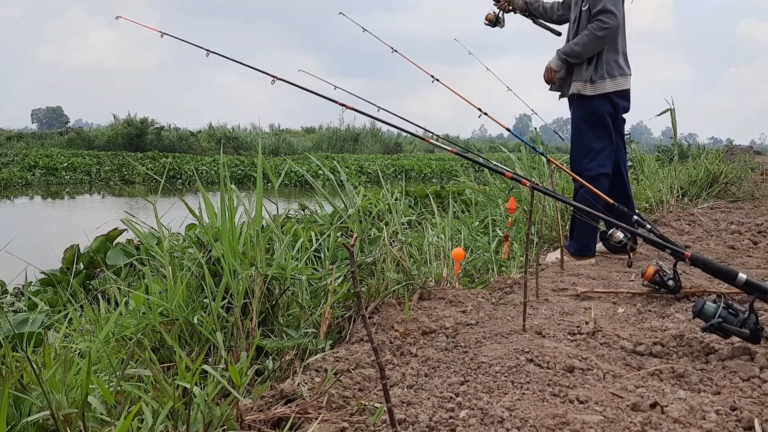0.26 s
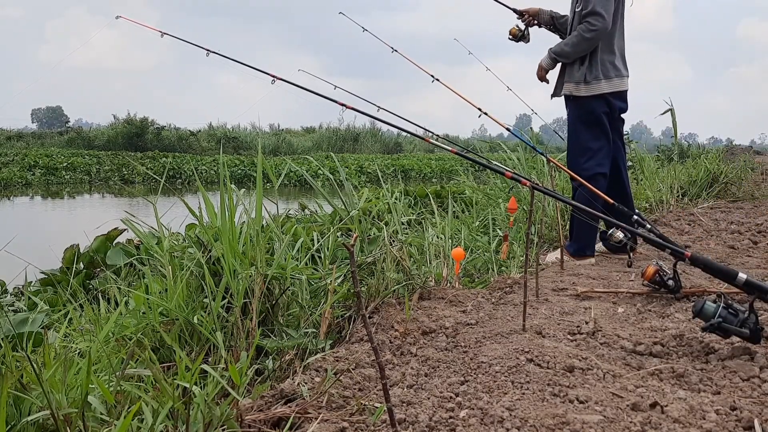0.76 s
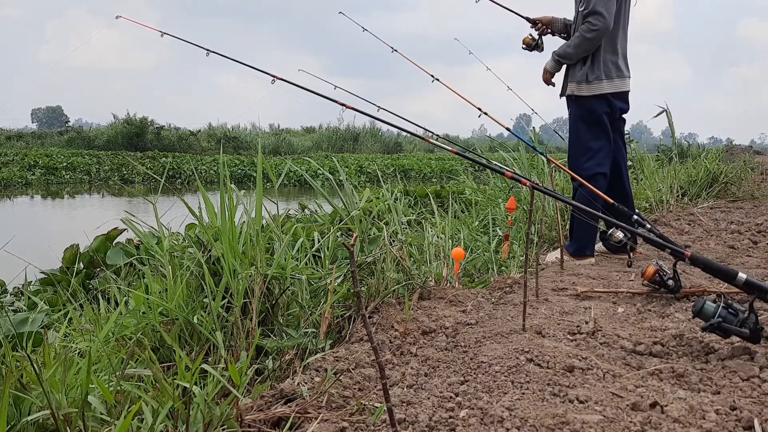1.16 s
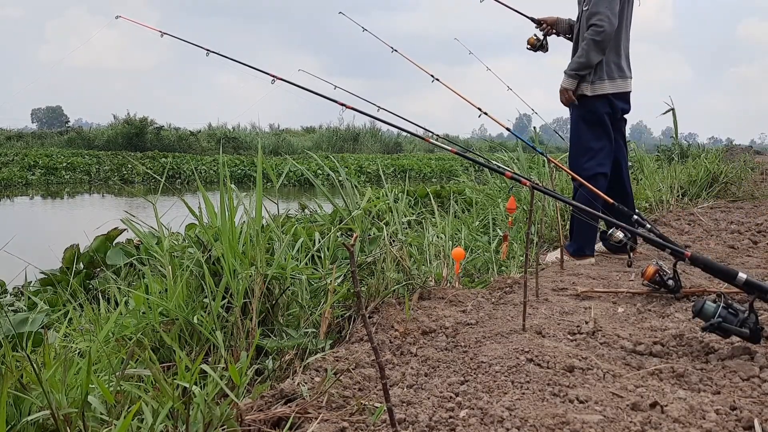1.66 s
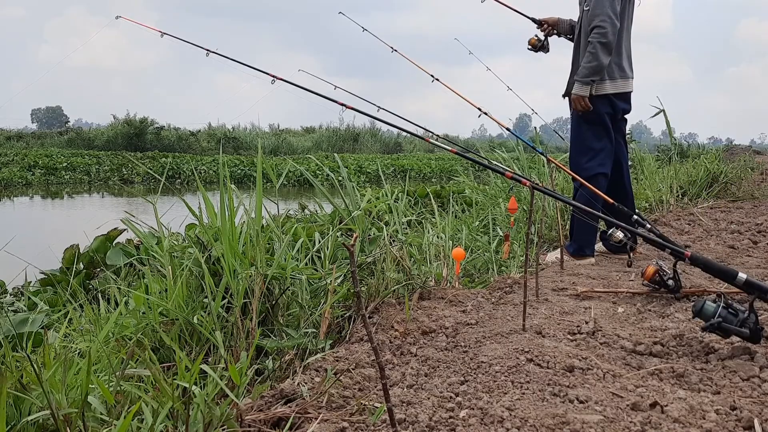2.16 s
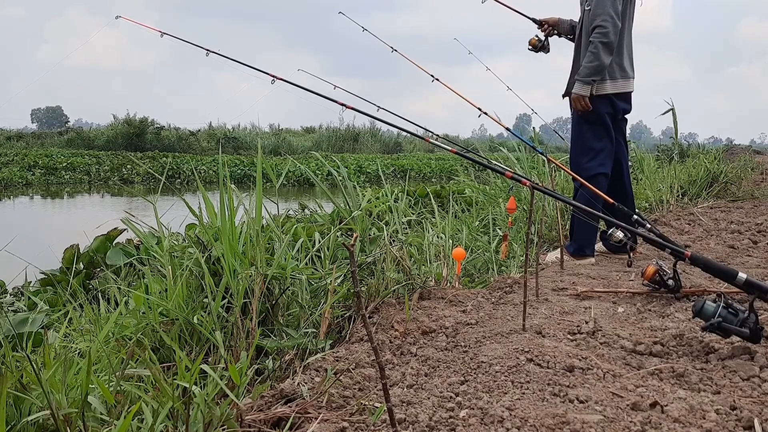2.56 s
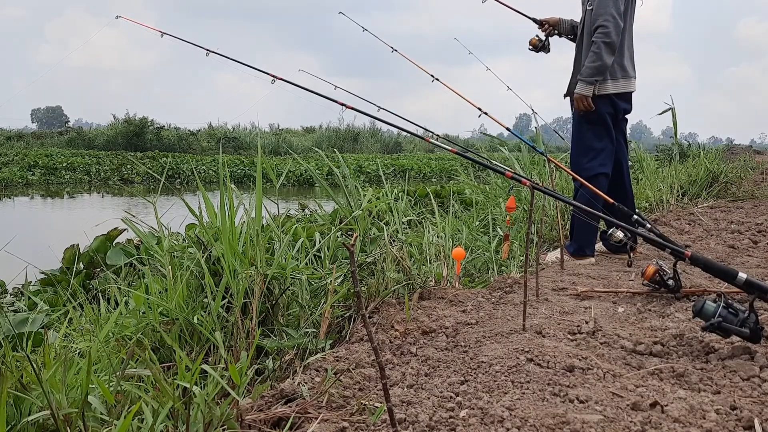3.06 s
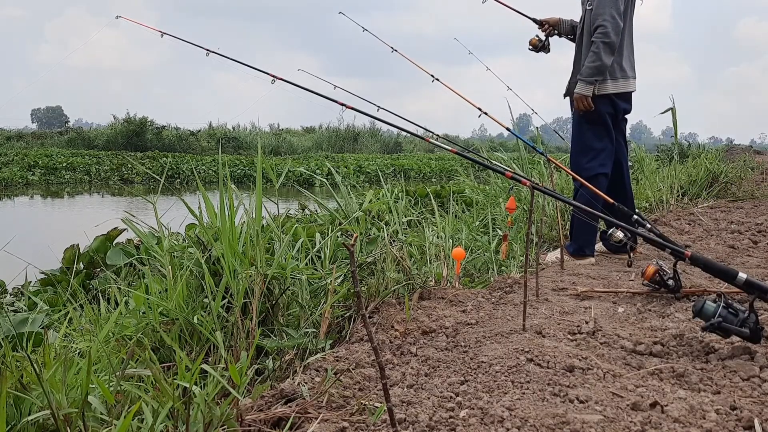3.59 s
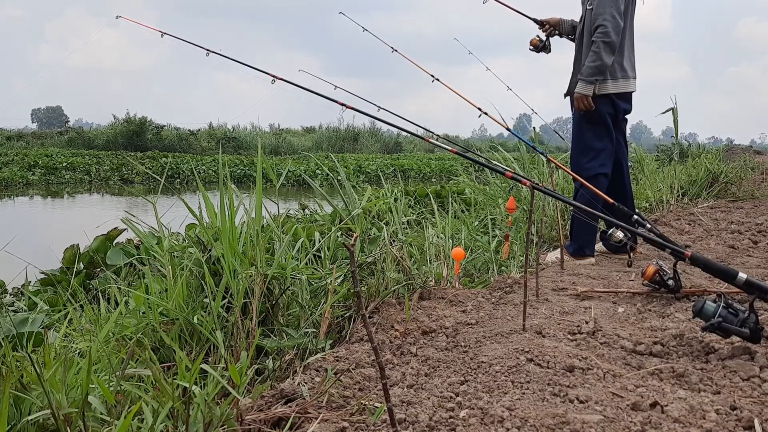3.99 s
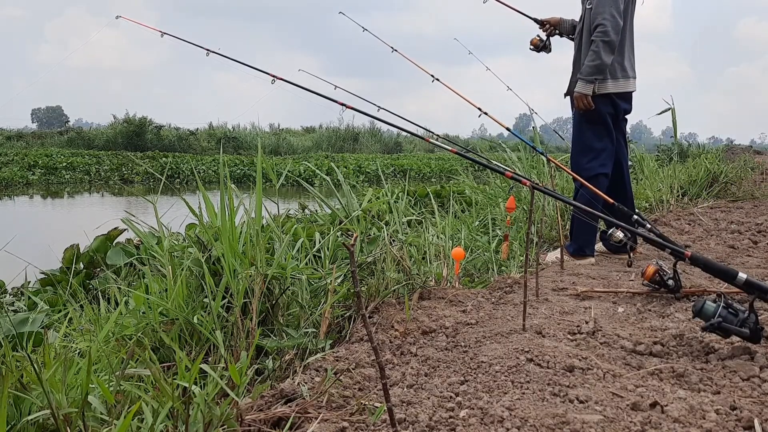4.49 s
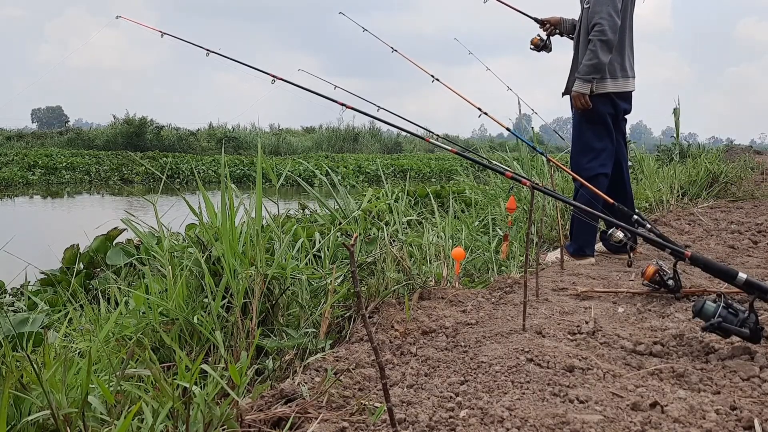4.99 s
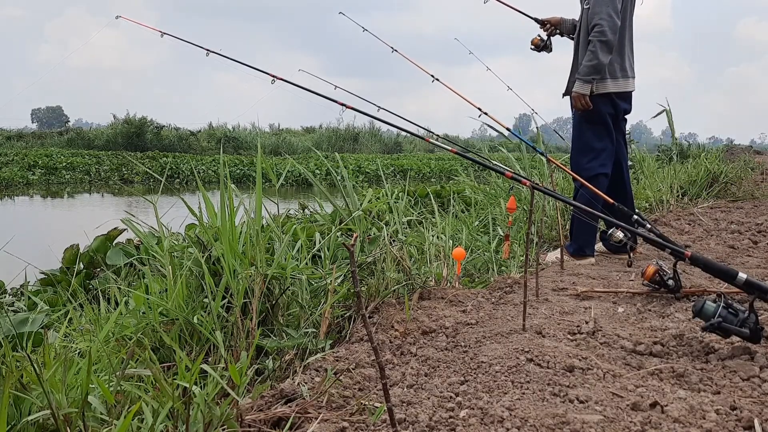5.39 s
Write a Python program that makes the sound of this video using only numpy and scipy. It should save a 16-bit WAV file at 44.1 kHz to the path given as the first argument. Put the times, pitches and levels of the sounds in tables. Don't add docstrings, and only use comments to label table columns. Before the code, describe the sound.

On an open grassy pond bank, a stereo phone picks up rolling wind and two far pump engines droning low. A thump hits the right early, heavy bursts follow between about 1.7 and 3.4 seconds, then more near 4.8 and 5.5. Faint grass hiss, dry ticks, a high insect scrape, tiny bird chirps and distant road hum sit beneath.

```python
import sys
import numpy as np
from scipy import signal
from scipy.fft import rfft, irfft, next_fast_len
from scipy.io import wavfile
from scipy.ndimage import map_coordinates

SR = 44100
rng = np.random.default_rng(int(sys.argv[2]) if len(sys.argv) > 2 else 0)


def rack_gain(trim_db):
    fader = np.asarray(trim_db, float)
    return 10 ** (fader / 20)


def unload_audio(sound):
    columns = np.transpose(np.atleast_2d(sound))
    steps = np.round(np.clip(columns, -1, 1) * 32767)
    wavfile.write(sys.argv[1], SR, steps.astype(np.int16))


N = 248724
TIME_S = np.arange(N) / SR

# frequency in [Hz], density in [dB per Hz].
AIR_SPECTRUM = [(500, -12.5), (1300, -0.5), (2000, 0.5), (3000, -1), (3600, -4.5), (5000, -9),
                (16000, -9.5)]
# frequency in [Hz], density in [dB per Hz].
ROAD_SPECTRUM = [(450, -36), (640, -6.5), (770, 1.5), (950, -0.5), (1180, -3), (1300, -7), (1800, -27.5),
                 (3000, -27)]
# time in [s], level in [dB], nearness as brightness in [dB].
TRAFFIC = [(0, -68, 5), (.42, -61, -12.5), (.58, -67, 1), (.75, -62, -10), (1.2, -64.5, -7.5),
           (1.68, -60.5, -16), (2.2, -59, -15), (2.52, -65, -7), (2.85, -56.5, -7), (3.08, -69.5, 10.5),
           (3.3, -61, -4), (3.68, -60.5, 4.5), (3.92, -63.5, -3), (4.15, -62, 2.5), (4.4, -60.5, -1),
           (4.75, -60, -10), (5.05, -63.5, 1.5), (5.64, -61, -15)]
# frequency in [Hz], density in [dB per Hz].
GRASS_SPECTRUM = [(3000, -14), (4300, -7.5), (5600, -3.5), (6400, -1.5), (7400, -2), (8600, -1.5),
                  (9300, -5), (10200, -5.5), (11300, -2), (11800, -3.5), (13000, -1), (14200, -4),
                  (15600, -4)]
# time in [s], level in [dB], thin tips against broad blades in [dB].
SWAY = [(0, -59.5, -0.5), (.3, -61, -0.5), (.56, -60, -2.5), (.95, -65.5, 1), (1.2, -63.5, 1.5),
        (1.55, -60, 0.5), (1.85, -56, 1.5), (2.35, -58, 1), (2.66, -62, 2.5), (3.05, -59, -5),
        (3.25, -65, 0.5), (3.5, -62, 0.5), (4.06, -67, -1), (4.48, -64, 0.5), (4.98, -65.5, 1),
        (5.22, -63.5, -2.5), (5.46, -65.5, -3), (5.64, -64, -3)]
# time in [s], rise left in [dB], rise right in [dB], length in [ms].
RUSTLES = [(.032, 3, 0, 28), (.182, 4.5, 0, 40), (.4, 6, 1, 32), (0.587, 3.5, -3, 30),
           (1.242, 7.5, 2.5, 39), (2.584, -0.5, 3, 28), (2.783, 4.5, 2, 15), (2.866, 1, 8.5, 25),
           (3.048, 4, 6, 12), (4.736, 4, 2, 24), (4.895, 5, 7, 18), (5.22, 3.5, 2.2, 63)]
# time in [s], peak in [dB], frequency in [Hz], left minus right in [dB].
TICKS = [
    (0.9803, -34.5, 8000, 3),
    (1.207, -34, 7880, 0.5),
    (2.852, -37, 6560, 0),
    (3.3861, -47.5, 5040, 0),
    (4.4698, -36, 8130, -8),
    (4.731, -35, 7800, 0.0),
    (4.891, -38, 7480, 1),
    (5.5993, -40.5, 7700, 8),
]
# frequency in [Hz], width in [Hz], level in [dB].
WING_RESONANCES = [
    (7720, 140, -68),
    (7990, 320, -67),
    (11350, 300, -75),
]
# start in [s], length in [s], start pitch in [Hz], end pitch in [Hz], level in [dB].
CHIRPS = [(0.641, .075, 1780, 1950, -69), (.68, 0.055, 1660, 1820, -68), (0.735, 0.053, 1660, 1740, -68),
          (1.94, 0.089, 3080, 3200, -66.5), (2.155, 0.083, 2930, 2680, -66),
          (2.22, 0.06, 2900, 3090, -65.5), (2.389, 0.04, 2720, 2720, -67.5), (2.43, .05, 2780, 3010, -68),
          (2.39, .08, 2250, 2330, -73), (2.619, 0.064, 2700, 2770, -71), (3.42, 0.046, 4050, 3980, -68),
          (3.507, 0.057, 3170, 3240, -69), (3.52, .04, 2950, 2900, -68)]
# frequency in [Hz], density in [dB per Hz].
ROLL_SPECTRUM = [(15, -17), (30, -28), (45, -2.5), (60, -4), (85, -0.5), (105, 3), (140, -8), (160, -9),
                 (200, -20), (260, -29.5), (400, -38.5)]
# frequency in [Hz], density in [dB per Hz].
WHOOSH_SPECTRUM = [(150, -2), (230, -6), (295, 4), (340, -1.5), (420, -13), (600, -15.5), (1000, -27),
                   (2000, -39.5)]
# time in [s], gust strength in [dB], veer towards the left port in [dB].
WIND = [(0, -51, -1), (.3, -57.5, 5), (.56, -49.5, 4), (.95, -62.5, -3), (1.3, -53.5, 3.5), (1.55, -53, -2),
        (1.8, -51, 7), (2.15, -49, 0), (2.5, -53.5, 7), (2.75, -51, -10), (3.1, -55, -2),
        (3.4, -50.5, -5.5), (3.95, -56.5, 3), (4.4, -56, -4.5), (4.62, -52.5, 6), (4.88, -54, -12),
        (5.2, -56, 0), (5.64, -58.5, -0.5)]
# time in [s], peak in [dB], frequency in [Hz], length in [ms].
BUFFETS = [(0.153, -7.5, 74, 19.4), (0.193, -24, 96, 10), (1.672, -41, 80.03, 17),
           (1.716, -44, 81.08, 22.3), (1.747, -29, 79.2, 13), (1.858, -7, 86, 15), (1.88, -23, 56.5, 5.0),
           (1.893, -22, 77.0, 11.6), (2.027, -30, 75.27, 20.0), (2.548, -25, 74.0, 14.0),
           (2.59, -32, 75.0, 16.1), (2.682, -15, 62.5, 23.0), (2.718, -24, 75, 19), (2.75, -20, 73, 12.4),
           (2.786, -10.5, 58.75, 30.0), (2.822, -13, 70.6, 15), (2.851, -19, 62.17, 14.0),
           (2.892, -6.5, 75.6, 22.8), (2.954, -12.5, 71, 19), (3.064, -38, 68.3, 18.4),
           (3.259, -30, 78.3, 28.0), (3.384, -10, 75.96, 17.4), (3.425, -35, 65, 23.0),
           (3.603, -34, 65.5, 40.0), (4.785, -10, 82, 23), (4.806, -22, 110.0, 6.8),
           (4.825, -11.5, 119, 10.5), (4.895, -16.5, 101, 19), (4.914, -26, 78.0, 9.3),
           (5.473, -16, 75, 15)]
# time in [s], peak in [dB], frequency in [Hz], length in [ms].
FLICKS = [
    (2.74, -23, 170, 4.8),
    (2.905, -29.5, 240, 4.2),
    (5.3, -29.5, 299, 9),
    (4.829, -26, 206, 6.5),
    (4, -28, 170, 8),
]
# time in [s], big pump firing in [Hz], small pump firing in [Hz].
SPEED = [(0, 96.6, 57), (.55, 96.3, 57.2), (.9, 97.5, 57.1), (1.4, 96.2, 57.5), (2, 96.1, 58.1),
         (2.7, 96.7, 58), (3.6, 96.5, 58), (4.2, 96.9, 57.4), (4.8, 96.1, 57.1), (5.3, 95.7, 58.1),
         (5.64, 96.2, 58.5)]
# time in [s], level in [dB].
BIG_LEVEL = [(0, -23), (.22, -23), (.58, -20.5), (.76, -27), (1.1, -30.5), (1.43, -19), (1.76, -20),
             (2.2, -22), (2.42, -21), (2.75, -25), (3.08, -21.5), (3.42, -19.5), (3.74, -25), (4.2, -27),
             (4.62, -29.5), (4.84, -23.5), (5.2, -23), (5.64, -28)]
# time in [s], level in [dB].
SMALL_LEVEL = [(0, -46), (.22, -34.5), (.45, -42.5), (.76, -32.5), (.9, -47), (1.05, -35.5), (1.3, -44),
               (1.55, -36), (1.9, -44), (2.4, -31), (2.85, -39), (3.12, -40.5), (3.4, -29), (3.75, -36.5),
               (4.1, -36), (4.62, -36.5), (4.85, -30.5), (5.64, -45.5)]
# time in [s], depth in [dB], width in [s].
FADES = [
    (.33, 2.5, 0.038),
    (.9, 22, 0.047),
    (1.54, 5, 0.076),
    (1.87, 1, 0.047),
    (2.54, 4, 0.046),
    (3.19, 2, 0.039),
    (4.02, 8, 0.096),
    (5.05, 11.5, 0.061),
    (5.47, 13.5, 0.097),
]
# level against the strongest in [dB], waver in [dB].
SMALL_MULTIPLES = [
    (-7.5, 4.5),
    (0, 2.2),
    (-16, 2),
]
# frequency in [Hz], left minus right in [dB].
SHADE = [(60, -2.5), (500, 2.3), (770, -5.5), (1200, 0.9), (4300, 1.4), (6000, -3.5), (8500, -1),
         (9900, 5.5), (11300, 4), (12500, 0), (15000, -2)]


def columns(table):
    s, *cols = np.transpose(table)
    return [np.interp(TIME_S, s, col) for col in cols]


def on_log(table, hz):
    table_hz, value = np.transpose(table)
    return np.interp(np.log(hz), np.log(table_hz), value)


def walk(rate_hz):
    knots = rng.standard_normal(1200)
    wander = map_coordinates(knots, [np.arange(0, N, 64) * rate_hz / SR], order=2)
    return wander.repeat(64)[:N]


def bump(t_s, width_s):
    return np.exp(-.5 * (t_s / width_s) ** 2)


def bed(spectrum, like, swell_db, flicker_db, flicker_hz, lag_s=0., swell_hz=4.904):
    size = next_fast_len(N)
    hz = np.maximum(np.arange(size // 2 + 1) * SR / size, 1)
    right, other = rfft(rng.standard_normal((2, size)))
    left = (like * right + np.sqrt(1 - like ** 2) * other) * np.exp(-2j * np.pi * hz * lag_s)
    pair = np.array([left, right]) * rack_gain(on_log(spectrum, hz))
    half_octave = 2 * np.log2(hz)
    first, last = int(2 * np.log2(spectrum[0][0])), int(2 * np.log2(spectrum[-1][0]))
    out, swell = 0, walk(swell_hz)
    for band in range(first, last + 2):
        stop = np.searchsorted(half_octave, band + 1)
        window = np.cos(np.pi / 2 * np.maximum(half_octave[:stop] - band, -1)) ** 2
        noise = irfft(pair[:, :stop] * window, size)[:, :N]
        out = out + noise * rack_gain(swell_db * swell + flicker_db * walk(flicker_hz))
    return out / np.sqrt(np.mean(out ** 2))


def brighten(x, hz, db):
    top = signal.sosfilt(signal.butter(4, hz, "high", fs=SR, output="sos"), x)
    rest = signal.sosfilt(signal.butter(4, hz, "low", fs=SR, output="sos"), x)
    return rest + rack_gain(db) * top


def add(out, s, sound):
    i = int(s * SR) - sound.shape[-1] // 2
    out[:, i:i + sound.shape[-1]] += sound


def still_air():
    sway_db, _ = columns(SWAY)
    air = bed(AIR_SPECTRUM, like=0.17, swell_db=1.47, flicker_db=1.2, flicker_hz=10, lag_s=0.00022)
    return rack_gain(0.45 * (sway_db + 5.0) - 34.5) * air


def road():
    road_db, near_db = columns(TRAFFIC)
    hum = bed(ROAD_SPECTRUM, like=0.74, swell_db=0.8, flicker_db=1.66, flicker_hz=10, lag_s=0.00039)
    return rack_gain(road_db + 5.0) * brighten(hum, 916, near_db + 0.5)


def grass():
    sway_db, tips_db = columns(SWAY)
    usual_db, duller_db_per_db = -63, .3
    bright_db = tips_db - duller_db_per_db * (sway_db - usual_db)
    hiss = bed(GRASS_SPECTRUM, like=.02, swell_db=.4, flicker_db=.7, flicker_hz=14, swell_hz=19)
    brush_db = np.zeros((2, N))
    for s, left_db, right_db, ms in RUSTLES:
        brush_db += np.outer([left_db, right_db], bump(TIME_S - s, ms * 0.00042))
    return rack_gain(sway_db + 5.42 + brush_db) * brighten(hiss, 8300, bright_db)


def snapping_blades():
    out, t = np.zeros((2, N)), np.arange(-800, 800)
    decay = np.exp(-np.abs(t) / np.where(t < 0, 25., 170.))
    for s, db, hz, pan_db in TICKS:
        crack = rng.standard_normal((2, len(t))) * decay
        crack = signal.sosfilt(signal.butter(2, .7 * hz, "high", fs=SR, output="sos"), crack)
        pan = np.array([[pan_db], [-pan_db]]) / 2
        add(out, s, rack_gain(db - 9.5 + pan) * crack)
    return out


def insect():
    beats_hz, first_s = 9.015, .085
    beat = np.cos(2 * np.pi * beats_hz * (TIME_S - first_s))
    effort = (.6 + .75 * np.exp(1.5 * (beat - 1))) * rack_gain(2.2 * walk(6))
    out = 0
    for hz, width_hz, db in WING_RESONANCES:
        band_hz = [hz - width_hz / 2, hz + width_hz / 2]
        wing = signal.butter(1, band_hz, "band", fs=SR, output="sos")
        scrape = signal.sosfilt(wing, rng.standard_normal((2, N)))
        out = out + scrape / scrape.std() * rack_gain(db)
    return out * effort * rack_gain([[1.5], [-1.5]])


def bird():
    out = np.zeros((2, N))
    hoarse, warble = walk(190), walk(45)
    for s, length_s, start_hz, end_hz, db in CHIRPS:
        count, i = int(length_s * SR), int(s * SR)
        hz = np.linspace(start_hz, end_hz, count) * (1 + .018 * warble[i:i + count])
        note = np.sin(2 * np.pi * np.cumsum(hz) / SR) * np.hanning(count) ** 0.2
        grain = .9 + .5 * hoarse[i:i + count]
        add(out, s + length_s / 2, rack_gain(db + 4) * note * grain * np.array([[.8], [1]]))
    return out


def wind_roll():
    gust_db, veer_db = columns(WIND)
    roll = bed(ROLL_SPECTRUM, like=0.93, swell_db=1.64, flicker_db=-0.3, flicker_hz=6.6)
    usual_roll_db, usual_gust_db, follow_db_per_db = -33.5, -52.5, 0.52
    roll_db = usual_roll_db + follow_db_per_db * (gust_db - usual_gust_db)
    return roll * rack_gain([roll_db + side * veer_db / 2 + 3 * walk(6) for side in (1, -1)])


def wind_whoosh():
    gust_db, _ = columns(WIND)
    whoosh = bed(WHOOSH_SPECTRUM, like=0.3, swell_db=0.06, flicker_db=2.24, flicker_hz=12, lag_s=0.00012)
    return rack_gain(gust_db + 3.0) * whoosh


def wind_thumps():
    out, t = np.zeros((2, N)), np.arange(-2000, 2000) / SR
    for s, db, hz, ms in BUFFETS + FLICKS:
        push = bump(t, ms * 0.00043)
        swing = np.cos(2 * np.pi * (hz * t * (1 - 2.8 * t) + rng.random()))
        sharpened = swing + 0.14 * swing ** 2 + 0.032 * swing ** 3
        slap = np.cos(2 * np.pi * 2.28 * hz * t) + 0.29 * np.cos(2 * np.pi * 3.39 * hz * t)
        thump = rack_gain(db - 2.0) * push * (sharpened + 0.048 * slap)
        add(out, s, thump * np.array([[.03], [1]]))
    return out


def tone(hz, db, lead_rad=0.):
    phase = 2 * np.pi * np.cumsum(hz) / SR + 6 * rng.random()
    return np.sqrt(2) * rack_gain(db) * np.sin([phase + lead_rad, phase])


def big_pump():
    (hz, _), (db,) = columns(SPEED), columns(BIG_LEVEL)
    for s, depth_db, width_s in FADES:
        db = db - depth_db * bump(TIME_S - s, width_s)
    waver = walk(9)
    hz = hz + .45 * waver[::-1]
    firing = tone(hz, db + waver)
    double = tone(2 * hz, 0.68 * db - 42.5 + 2.0 * walk(5.1), lead_rad=0.13)
    return firing + double


def small_pump():
    (_, hz), (db,) = columns(SPEED), columns(SMALL_LEVEL)
    out = 0
    for multiple, (step_db, waver_db) in enumerate(SMALL_MULTIPLES, 1):
        out = out + tone(multiple * hz, db + step_db + waver_db * walk(8), lead_rad=-0.18)
    return out


def scene():
    background = still_air() + road() + grass() + snapping_blades() + insect() + bird()
    wind = wind_roll() + wind_whoosh() + wind_thumps()
    return background + wind + big_pump() + small_pump()


def roll_off(x):
    return signal.sosfilt(signal.butter(12, 15750, fs=SR, output="sos"), x)


def record(dry):
    size = next_fast_len(N + 2048)
    hz = np.maximum(np.arange(size // 2 + 1) * SR / size, 1)
    shade_db = on_log(SHADE, hz)
    faded_in = dry * np.minimum(np.arange(N) / 220, 1)
    padded = np.pad(faded_in, ((0, 0), (0, size - N)), "linear_ramp")
    top_hz = 15500
    response = rack_gain([shade_db / 2, -shade_db / 2]) * (hz < top_hz)
    mix = irfft(rfft(padded) * response, size)[:, :N]
    return roll_off(mix)


dry = scene()
out = record(dry)
unload_audio(out)
```